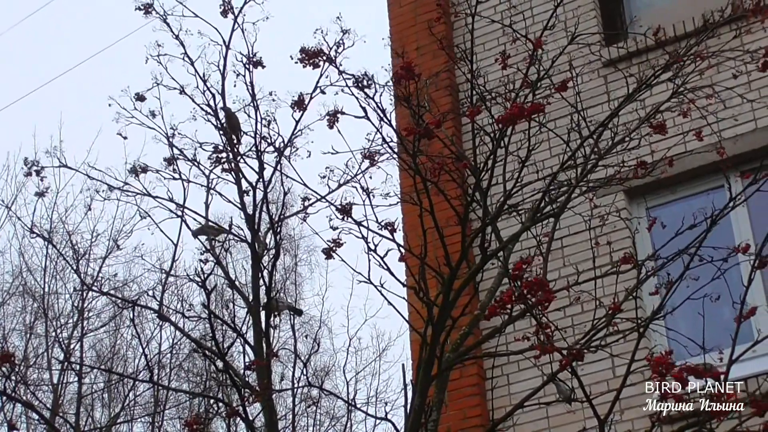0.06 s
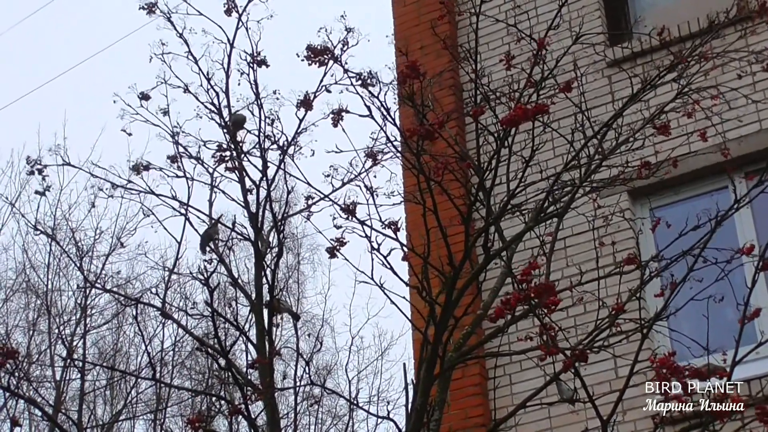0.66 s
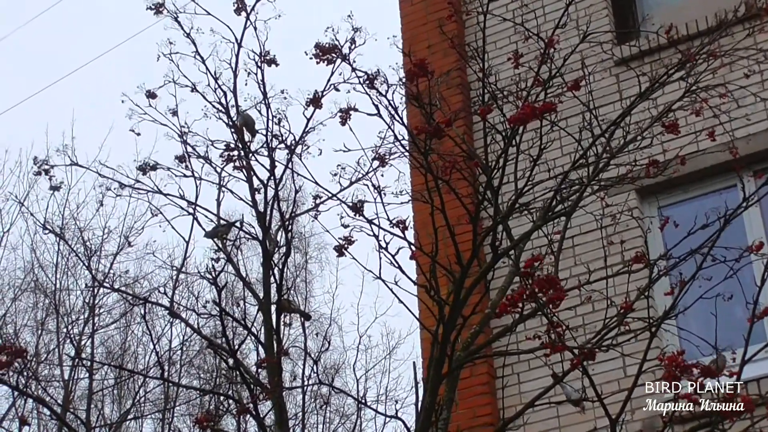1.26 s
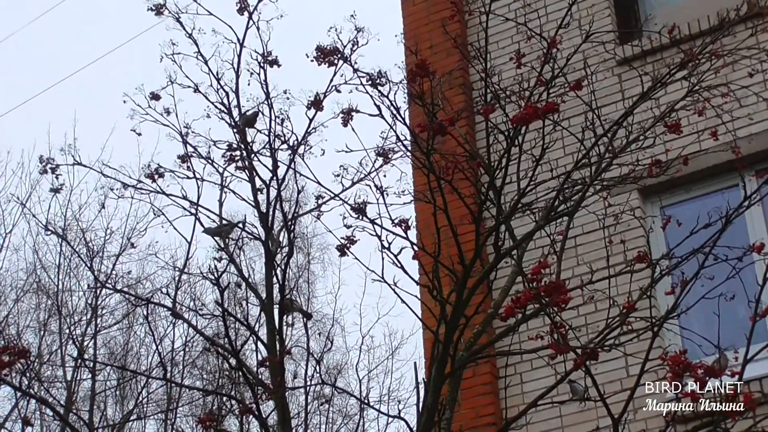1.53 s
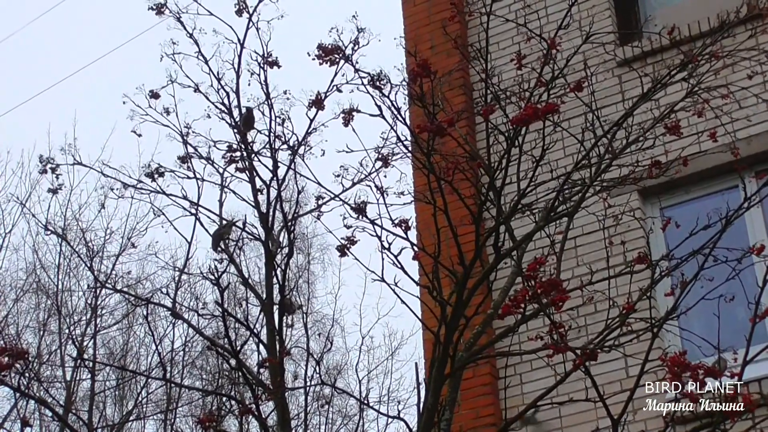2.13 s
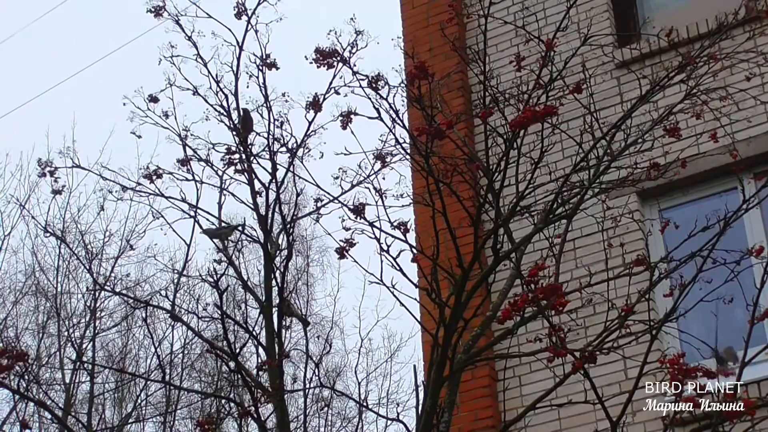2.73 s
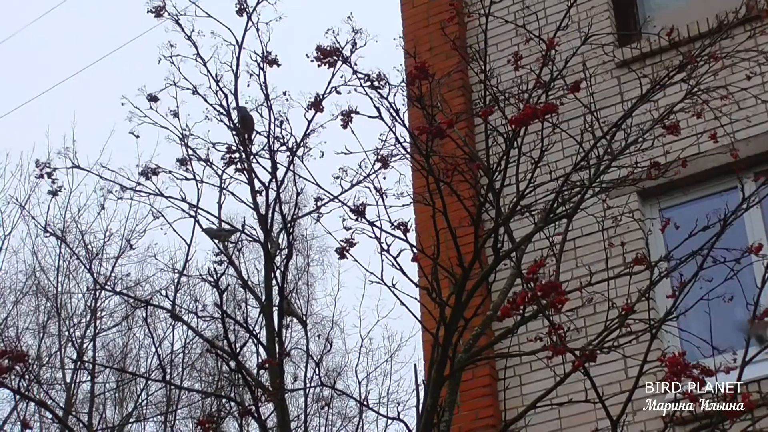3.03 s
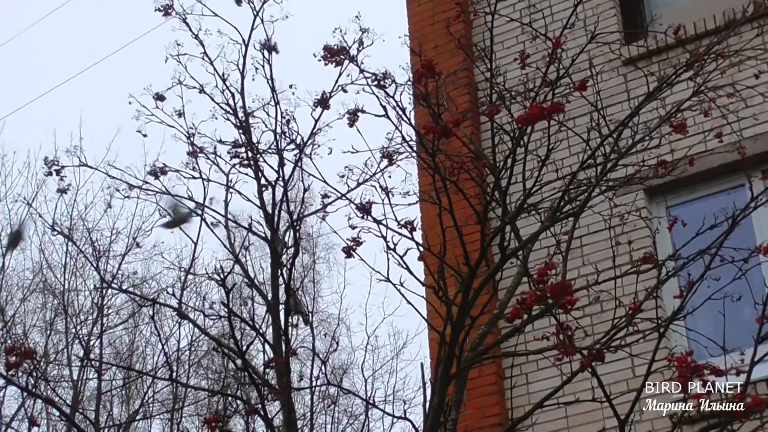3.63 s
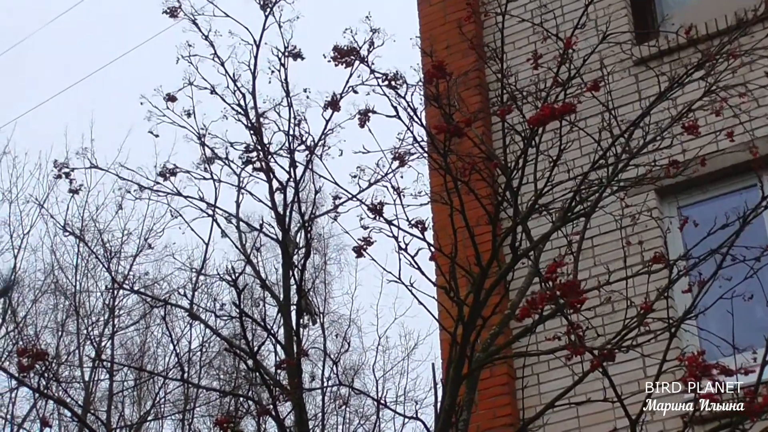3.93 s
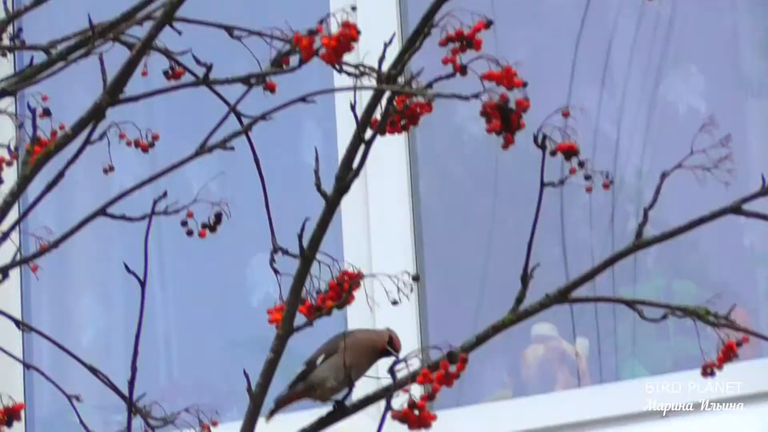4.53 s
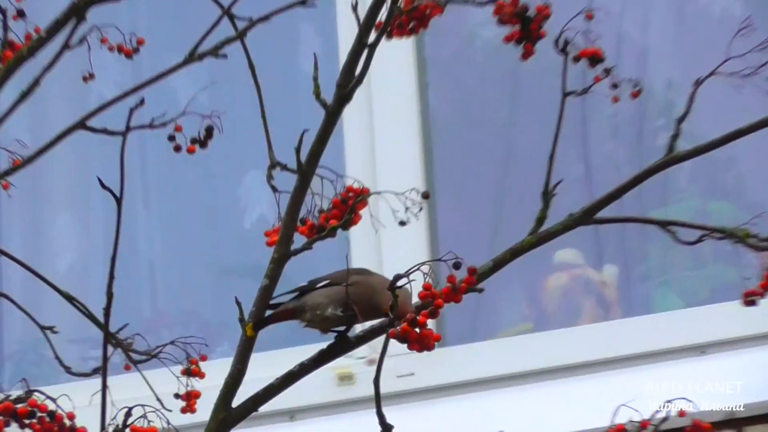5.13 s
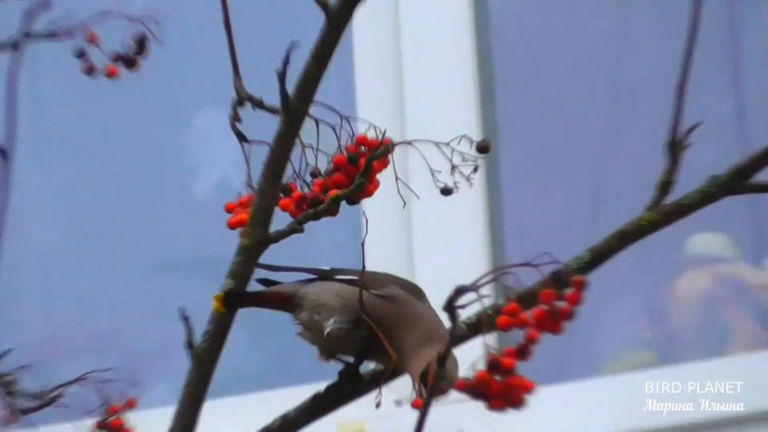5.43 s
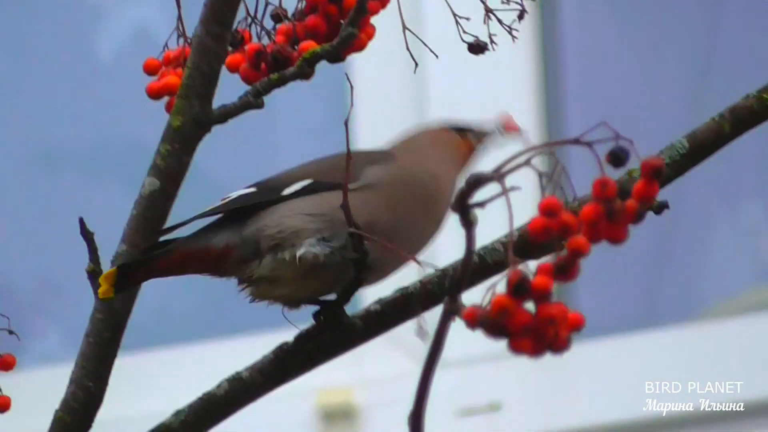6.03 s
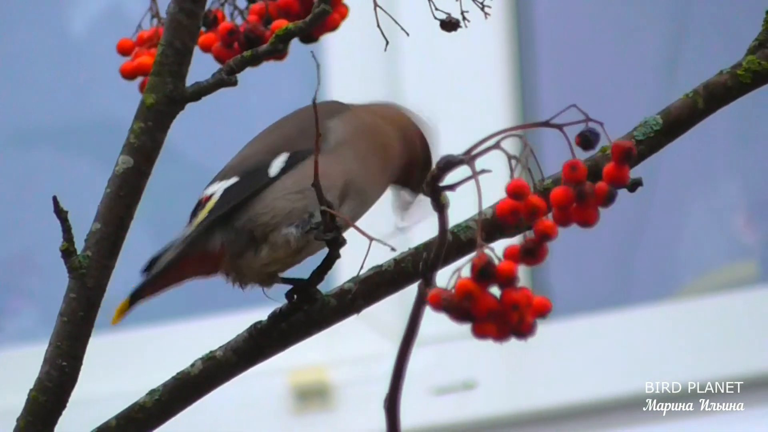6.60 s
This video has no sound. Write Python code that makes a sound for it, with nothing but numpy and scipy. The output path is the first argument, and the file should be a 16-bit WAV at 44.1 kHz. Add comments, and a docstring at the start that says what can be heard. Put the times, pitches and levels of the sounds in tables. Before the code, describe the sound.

High, rapid trilling from many small birds over faint town noise cuts to a single loud, slower trill from a bird nearby.

```python
"""A rowan tree beside a brick house, with a flock of waxwings trilling over a low town rumble.
Each trill is a string of whistled syllables that swoop up, sag and plunge, about thirty a second,
with slower, higher trills above. Birds deeper in the tree blur in the echoes; wings and twigs stir.
At 4.7 s the scene switches to a quieter spot: one bird close to the microphone swells into a slow,
high trill, with thin whistles and a wash of other birds in the distance."""
import sys
import numpy as np
from scipy import signal
from scipy.fft import rfft, irfft
from scipy.io import wavfile
from scipy.ndimage import uniform_filter1d

SR = 44100
rng = np.random.default_rng(int(sys.argv[2]) if len(sys.argv) > 2 else 0)


def transcribe(signal):
    """Save signal, clipped to [-1, 1], as a 16-bit WAV file at the path in sys.argv[1]."""
    frames = np.atleast_2d(signal).T
    limited = np.clip(frames, -1, 1)
    pcm = np.round(limited * 32767).astype(np.int16)
    wavfile.write(sys.argv[1], SR, pcm)


N = 298116
TIME = np.arange(N) / SR
SWITCH_S = 4.705   # from the flock to the quieter spot
SLOW_FILL = 0.98   # share of its period that a slow syllable lasts

# Sweep of a quick, arched syllable and of a slow, saw-toothed one:
# (position [share of length], pitch [share of top pitch], level [dB])
ARCH_SWEEP = [(0, 0.634, -4), (.1, .92, 4), (.2, 0.99, 1), (.33, 0.94, 0), (.68, .9, 2), (.78, .75, -5.5),
              (.88, 0.452, -10.5), (1, .43, -33)]
SAW_SWEEP = [(0, .64, -14), (.05, .85, -1), (.1, 1, -1), (.2, .98, -2), (.45, .925, 0), (.82, .865, 0),
             (.9, .7, -9), (1, .51, -24)]
# Quick trills at the front of the tree. Every trill row opens with (start [s], syllables [count],
# lag at the middle [s], crest position [0-1], first, crest, last pitch [Hz], first, crest, last
# level [dB]); these end with (third harmonic [dB], gain at the foot of the plunge [dB])
FRONT_QUICK_TRILLS = [ (.004, 8, .004, 0.31, 6000, 6065, 5910, -29.5, -23, -32, -33, 4),
                      (.253, 15, 0.0037, .45, 5060, 5220, 5070, -29.5, -25, -26, -22.5, -15),
                      (.474, 13, -0.0057, .5, 5500, 5450, 5750, -29.5, -31, -29, -33, -8),
                      (.886, 8, -0.0028, .3, 5750, 5690, 5300, -32.5, -29.5, -31.5, -38, 0),
                      (1.159, 8, -0.0029, 0.44, 5510, 5480, 5420, -28, -31, -30.5, -38, -10),
                      (1.433, 12, 0.0041, 0.11, 5310, 5480, 4980, -29, -29, -30.5, -25, 0.5),
                      (1.819, 8, -0.011, .5, 5520, 5500, 4400, -44, -40, -35, -37, 12),
                      (2.078, 10, .003, 0.38, 5720, 5830, 4910, -29.5, -24, -26, -37, 6),
                      (2.368, 5, .001, .5, 5490, 5670, 5490, -23.5, -21.5, -30.5, -36, -1),
                      (2.420, 15, -0.0023, 0.2, 5880, 5777, 5153, -20, -14, -17.5, -48, -18),
                      (2.911, 10, -.001, 0.41, 5120, 5000, 4440, -41, -30, -38, -41, 4.5),
                      (3.290, 9, .003, 0.29, 5540, 5660, 5110, -25, -21.5, -29, -37, -13),
                      (3.61, 8, 0.002, 0.38, 5730, 5690, 5630, -31.5, -29.5, -38, -33, 0),
                      (3.904, 9, .001, 0.31, 5780, 5730, 4900, -31.5, -33, -27.5, -33, -0.5),
                      (4.186, 16, 0.0055, 0.45, 5590, 5283, 5470, -32, -30.5, -28.5, -21, -3.5),
                      (4.268, 13, .001, .7, 5050, 5180, 5090, -35, -29, -28, -23, -2.5)]
# Slow, high trills above them: (the ten trill columns, period [s])
FRONT_HIGH_TRILLS = [ (.176, 5, 0.0096, 0.47, 7040, 7040, 6370, -42, -39.5, -31, 0.041),
                     (.385, 7, -0.00023, 0.9, 6150, 7020, 6740, -36.5, -43, -59, 0.041),
                     (0.794, 8, 0.0034, 0.34, 6290, 7070, 6280, -33.5, -39, -47, 0.045),
                     (0.914, 4, -0.00053, .65, 6200, 6860, 6550, -49, -34.5, -38, 0.046),
                     (1.935, 7, .001, 0.46, 6950, 7220, 7430, -38, -44.5, -41.5, .0465),
                     (2.42, 10, 0.015, 0.6, 6450, 6450, 6800, -40, -47, -47, 0.051),
                     (2.886, 2, 0.0028, .5, 7670, 7660, 7550, -43, -43, -43, 0.042),
                     (2.982, 6, -.004, 0.53, 5960, 5930, 6230, -32.5, -28.5, -35.5, 0.039),
                     (3.462, 4, .001, 0.66, 6160, 5930, 5900, -36.5, -32.5, -35, 0.039),
                     (3.610, 2, 0, .5, 7000, 7100, 7200, -35, -38, -39, 0.039),
                     (3.821, 6, -0.011, .4, 6250, 7370, 6940, -39, -44.5, -40.5, .047),
                     (3.849, 7, -0.0019, 0.4, 6540, 6550, 6330, -39.5, -39, -49, .046),
                     (4.390, 5, -0.0078, 0.34, 6050, 6070, 6030, -40, -41, -31, 0.059),
                     (4.651, 1, 0.0049, .5, 7630, 7680, 7600, -38.5, -39, -39, .045)]


def front_birds(quick_period_s=.0329, quick_length_s=.029):
    """The flock's birds nearest the microphone: clear quick trills, and slow high ones with more echo."""
    quick, high = np.zeros(N), np.zeros(N)
    for *shape, third_db, plunge_db in FRONT_QUICK_TRILLS:
        for s, top_hz, db in trill(quick_period_s, *shape):
            note = chirp(ARCH_SWEEP, quick_length_s, top_hz, db, (-35, third_db), plunge_db, waver=.013)
            add(quick, s, note)
    for *shape, period_s in FRONT_HIGH_TRILLS:
        for s, top_hz, db in trill(period_s, *shape):
            add(high, s, syllable(SAW_SWEEP, SLOW_FILL * period_s, top_hz, db, overtones_db=(-30, -45)))
    quick_envelope = np.sqrt(np.abs(uniform_filter1d(quick ** 2, size=40)))
    rasp = from_db(-36) * quick_envelope * rng.standard_normal(N)
    return with_echoes(quick + rasp, wet_db=-13.5, t60=.15) + with_echoes(high, wet_db=-7.5, t60=.36)


# The close bird's syllable, ending in a small hook:
# (position [share of length], pitch [share of top pitch], level [dB])
HOOK_SWEEP = [(0, 0.6, -8.5), (.055, .87, -0.5), (.1, 0.98, 0), (.2, 0.96, -2.5), (.45, .92, 1),
              (.79, .878, 1), (.85, .69, -12.5), (.92, .54, -24.5), (1, 0.58, -32)]
# Tone colour of the close bird's notes, filtered steeply above 6 kHz: (frequency [Hz], gain [dB])
CLOSE_COLOUR = [(3200, -2.5), (4500, 1), (5500, -2.5), (5850, -5), (6150, -15.5), (6500, -28.5)]
# Its soft lead-in, full trill and closing blip: (the ten trill columns, period [s])
CLOSE_SONG = [ (5.371, 9, .002, .4, 6120, 6430, 6000, -47, -32, -34, 0.055),
              (5.886, 13, .003, .48, 6390, 6420, 6030, -20.5, -8.5, -14, .0539),
              (6.592, 1, 0, .5, 6010, 6000, 6000, -18, -18, -18, .018)]


def close_bird(turned_away=0.4):
    """One bird close to the microphone, nearly a pure tone; softer notes arrive more by way of the wall."""
    direct, to_wall = np.zeros(N), np.zeros(N)
    notes = [(s, SLOW_FILL * period_s, top_hz, db)
             for *shape, period_s in CLOSE_SONG for s, top_hz, db in trill(period_s, *shape)]
    loudest_db = max(db for *_, db in notes)
    for s, length, top_hz, db in notes:
        note = syllable(HOOK_SWEEP, length, top_hz, db, waver=.0052, colour=CLOSE_COLOUR)
        add(direct, s, note)
        add(to_wall, s, note * from_db(turned_away * (loudest_db - db)))
    reflected = with_echoes(to_wall, wet_db=-10, t60=.36) - to_wall
    return direct + reflected


def trill(period_s, start_s, count, lag_s, crest, first_hz, crest_hz, last_hz, first_db, crest_db, last_db):
    """A bird's slightly uneven run of syllables, as (time [s], top pitch [Hz], level [dB])."""
    along = np.linspace(0, 1, int(round(count)))
    stages = [0, np.clip(crest, .01, .99), 1]
    early, sharp, strong = rng.standard_normal((len(along), 3)).T
    s = start_s + period_s * np.arange(len(along)) + lag_s * np.sin(np.pi * along) - .0005 * early
    hz = np.interp(along, stages, [first_hz, crest_hz, last_hz]) * (1 + .006 * sharp)
    db = np.interp(along, stages, [first_db, crest_db, last_db]) + 1.9 * strong
    return zip(s, hz, db)


# Harmonics carry best near 10 and 14.5 kHz: (frequency [Hz], gain [dB])
HARMONIC_CARRY = [(7800, -1.5), (9700, 2), (12500, -1.5), (14500, 2)]


def syllable(sweep, length, top_hz, level_db, overtones_db=(), waver=.011, colour=None):
    """One swept, wavering whistle; any harmonics grow with the bird's effort."""
    share, ratio, db = np.transpose(sweep)
    along = np.linspace(0, 1, int(max(length, .005) * SR))
    wobble = np.interp(along, np.linspace(0, 1, 9), rng.standard_normal(9))
    hz = uniform_filter1d(top_hz * np.interp(along, share, ratio) * (1 + waver * wobble), size=60)
    phase = 2 * np.pi * np.cumsum(hz) / SR + rng.uniform(0, 2 * np.pi)
    from_edge_s = np.minimum(along, 1 - along) * length
    fades = np.sin(np.pi / 2 * np.minimum(1, from_edge_s / .0015)) ** 2
    effort = from_db(np.interp(along, share, db))
    gain = fades * effort * from_db(level_db + (at_hz(colour, hz) if colour else 0))
    tone = np.sin(phase)
    for k, overtone_db in enumerate(overtones_db, 2):
        strength = from_db(overtone_db + at_hz(HARMONIC_CARRY, k * hz)) * np.minimum(effort, 1)
        tone += strength * np.sin(k * phase) * (k * hz < SR / 2)
    return uniform_filter1d(gain, size=24) * tone


def chirp(sweep, length, top_hz, level_db, overtones_db, plunge_db, waver):
    """A quick syllable whose harmonics, plunge depth and plunge strength vary by chance."""
    lift = np.clip(rng.normal(0, .2), -.5, .5)
    sweep = [(share, ratio * (1 + lift * (1 - ratio) ** 2), db) for share, ratio, db in sweep]
    colour = [(2600, rng.normal(plunge_db, 3.5)), (4700, .0057)]   # (frequency [Hz], gain [dB])
    return syllable(sweep, length, top_hz, level_db, rng.normal(overtones_db, 3.5), waver, colour)


# A quick syllable with a steep, deep plunge, sung further back in the tree:
# (position [share of length], pitch [share of top pitch], level [dB])
DEEP_SWEEP = [(0, 0.613, -15), (.08, .92, 1), (.16, 0.99, 5.5), (.28, .94, -4.5), (.62, .85, 3.5),
              (.7, .69, -3), (.78, 0.5217, -7.5), (.88, 0.42, -16), (1, 0.4, -23)]


def chorus(birds, period_s, length_s, first_hz, last_hz):
    """Birds trill over one another, each trill swelling and sinking in pitch; held near unit power."""
    voices = np.zeros(N)
    for _ in range(birds):
        s = rng.uniform(0, period_s)
        counts = rng.integers(10, 22, size=18)   # syllables in each of 18 trills
        paces, pitches = rng.normal(1, .05, size=18), rng.normal(1, .025, size=18)
        for count, pace, pitch in zip(counts, paces, pitches):
            for along in np.linspace(0, 1, count):
                if s < SWITCH_S:
                    top_hz = pitch * (first_hz + along * (last_hz - first_hz))
                    db = 6 * np.sin(np.pi * along) + rng.normal(0, 1.9)
                    add(voices, s, chirp(DEEP_SWEEP, length_s * pace, top_hz, db,
                                         overtones_db=(-29, -35), plunge_db=.4, waver=.0177))
                s += period_s * pace * rng.normal(1, .03)
    power = np.maximum(uniform_filter1d(voices ** 2, size=SR // 6), 0)
    return voices / np.sqrt(power + .01 * np.mean(voices ** 2))


# Rise and fall of the rest of the flock, in two stretches: (time [s], relative level [dB])
FLOCK_SWELL = [
    [(0.0, -33), (0.62, -33), (1.0, -37), (1.53, -36), (2.03, -40), (2.58, -31), (2.75, -30.5), (2.87, -33),
     (3.15, -39)],
    [(3.26, -40.5), (3.388, -46.5), (3.51, -45.5), (3.752, -41), (4.278, -35), (4.48, -39.5)],
]
# Bright hiss around the flock: (frequency [Hz], relative density [dB])
HISS_SPECTRUM = [(1200, -38.5), (2000, 5), (3500, 13), (6000, 12), (8000, -3.5), (10000, -3.5),
                 (12500, -3.5), (15500, -9.5)]


def deep_flock(hiss_follows=0.61):
    """Birds deeper in the tree, blurred by echoes from the house, and a faint hiss that follows them."""
    swell_db = np.interp(TIME, *np.vstack(FLOCK_SWELL).T)
    voices = chorus(birds=3, period_s=.033, length_s=.034, first_hz=5550, last_hz=4950)
    hiss = from_db(swell_db * hiss_follows - 26.5) * stereo_noise(HISS_SPECTRUM)
    return with_echoes(from_db(swell_db + 3) * voices, wet_db=-8.5, t60=.22) + hiss


# Thin whistles, far off: (time [s], length [s], pitch [Hz], base level [dB])
FAR_NOTES = [(5.097, 0.22, 3930, -61.5), (5.719, .125, 3725, -48.5), (6.047, .07, 3670, -49)]


def far_whistles():
    """A distant bird holds nearly level notes, their echoes almost as strong as the direct sound."""
    notes = np.zeros(N)
    slight_sag = [(0, 1.01, 4.5), (.3, 1, 8.2), (1, .99, 8)]
    for s, length, hz, db in FAR_NOTES:
        add(notes, s, syllable(slight_sag, length, hz, db, waver=.0058))
    return with_echoes(notes, wet_db=-1.5, t60=.19)


# Small movements among the branches: (time [s], length [s], band frequency [Hz], level [dB])
BRANCH_STIRS = [(.085, 0.034, 313, -40.5), (2.754, 0.018, 1190, -43), (2.8, 0.21, 151, -45),
                (3.678, 0.037, 447, -41), (4.112, 0.0075, 10000, -41.5), (5.625, 0.14, 114.6, -50),
                (5.631, 0.13, 320, -51), (6.393, 0.07, 100, -57.5)]


def branch_stirs():
    """Knocks, a twig's tick and wing flutters: soft bursts of noise, each about an octave wide."""
    bursts = np.zeros(N)
    for s, length, hz, db in BRANCH_STIRS:
        band = signal.butter(2, [hz * .54, hz * 1.3], "band", fs=SR, output="sos")
        noise = rms_one(signal.sosfilt(band, rng.standard_normal(SR)))
        along = np.linspace(0, 1, int(length * SR))
        add(bursts, s, from_db(db) * noise[-len(along):] * np.sin(np.pi * along ** .68))
    return bursts


# Distant birds at the quieter spot: (frequency [Hz], relative density [dB]) and (time [s], level [dB])
WASH_SPECTRUM = [(1300, -26), (2000, -10), (2600, -6), (3900, 1.5), (4700, -1), (5500, -20), (6800, -22.5),
                 (8200, -44.5)]
WASH_SWELL = [(4.7, -85.5), (4.83, -69), (4.95, -51), (5.25, -50), (5.55, -46), (6.2, -46), (6.55, -47),
              (6.75, -50.5)]


def distant_birds():
    """Birds too far from the microphone to tell apart merge into a wash of noise near 4 kHz."""
    return from_db(np.interp(TIME, *np.transpose(WASH_SWELL))) * stereo_noise(WASH_SPECTRUM)


# Town rumble as it reaches the tree: (frequency [Hz], relative density [dB])
RUMBLE_SPECTRUM = [(15, -34), (25, -1), (43, -9), (201, 0.5), (310, -2.5), (346, -5.5), (372, -4.5),
                   (497, -10), (689, -8.5), (937, -12.5), (1900, -16.5), (2470, -48.5), (4180, -120)]


def town_rumble():
    """The town's low rumble behind the flock, dipping just before the switch."""
    drift_db = np.interp(TIME, [0, 1.5, 3.7, 4.52, 4.62], [.5, -.5, 1.5, 0, -6.5])
    return from_db(-47.5 + drift_db) * stereo_noise(RUMBLE_SPECTRUM)


# Low town air, plus a separate faint hiss above 12 kHz: (frequency [Hz], relative density [dB])
QUIET_SPECTRUM = [(30, -8.5), (70, -3), (120, -2), (220, 0), (400, -6.5), (800, -11.5), (1500, -12),
                  (3000, -22.5), (8000, -46.5), (12500, -26.5), (15500, -21)]


def quiet_background():
    """Low town air and a faint high hiss behind the close bird, rising a little just after the switch."""
    rise_db = np.interp(TIME, [4.8, 4.95], [-4, 0])
    return from_db(-57.5 + rise_db) * stereo_noise(QUIET_SPECTRUM)


# Likeness of the noise at the microphone's left and right: (frequency [Hz], correlation [0-1])
STEREO_LIKENESS = [(40, .3), (125, .42), (250, 0.76), (500, 0.77), (1000, 0.92), (2500, 1)]


def stereo_noise(spectrum):
    """Noise of a given spectrum at unit power, wide in the bass and narrow in the treble."""
    hz = np.arange(N // 2 + 1) * SR / N
    alike = np.clip(at_hz(STEREO_LIKENESS, hz), 0, 1)
    mid, side = rfft(rng.standard_normal((2, N))) * from_db(at_hz(spectrum, hz))
    return rms_one(irfft(np.sqrt(1 + alike) * mid + np.sqrt(1 - alike) * side * [[1], [-1]], N))


def with_echoes(x, wet_db, t60, count=160):
    """A sound plus the many small echoes from walls and branches, dying by 60 dB in t60 seconds."""
    delay_s = .003 + rng.random(count) ** 2 * t60
    strength = rng.standard_normal(count) * from_db(-60 * delay_s / t60)
    response = np.zeros(SR)
    response[(delay_s * SR).astype(int)] = strength
    response *= from_db(wet_db) / np.sqrt(np.sum(response ** 2))
    return x + signal.fftconvolve(x, response)[:N]


def from_db(db):
    """Decibels to gain."""
    return 10 ** (np.asarray(db) / 20)


def rms_one(x):
    """Scale to unit power."""
    return x / np.sqrt(np.mean(x ** 2) + 1e-20)


def at_hz(points, hz):
    """Read a curve on a log-frequency axis."""
    point_hz, values = np.transpose(points)
    return np.interp(np.log(np.maximum(hz, 1)), np.log(point_hz), values)


def add(track, s, sound):
    """Mix a sound into a track at time s."""
    start = int(np.clip(s * SR, 0, N))
    track[start:start + len(sound)] += sound[:N - start]


def scene():
    """The flock in the rowan, then a 3 ms crossfade to the quieter spot with its close bird."""
    at_tree = np.clip((SWITCH_S - TIME) / .003, 0, 1)
    tree = town_rumble() + front_birds() + deep_flock()
    quiet_spot = distant_birds() + close_bird() + far_whistles() + quiet_background()
    return at_tree * tree + (1 - at_tree) * quiet_spot + branch_stirs()


def record(dry):
    """The treble is cut steeply above 15.7 kHz."""
    return signal.sosfilt(signal.ellip(10, .1, 80, 15700, fs=SR, output="sos"), dry)


dry = scene()
out = record(dry)
transcribe(out)
```